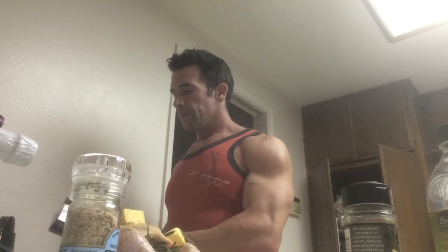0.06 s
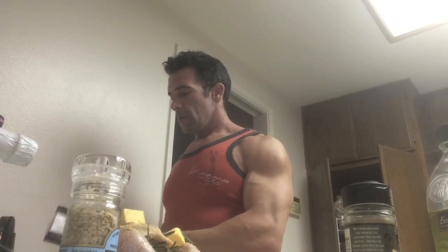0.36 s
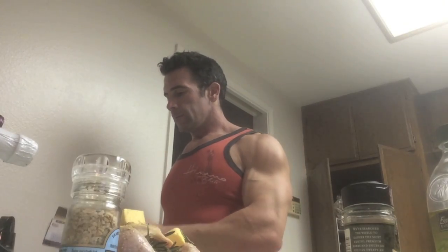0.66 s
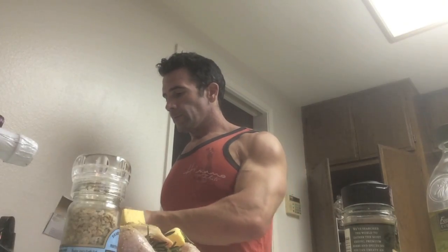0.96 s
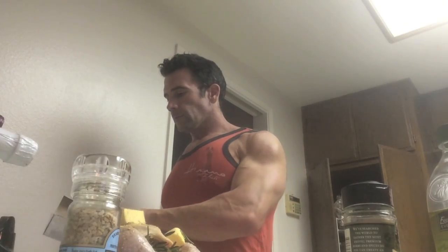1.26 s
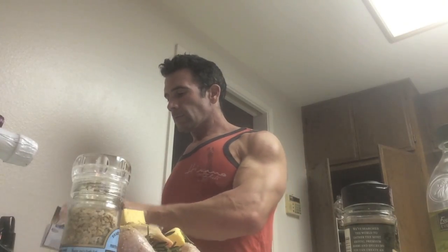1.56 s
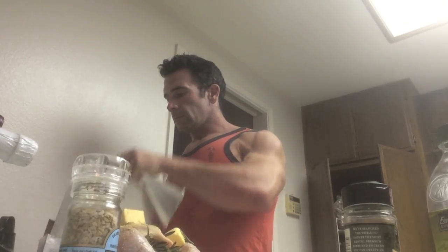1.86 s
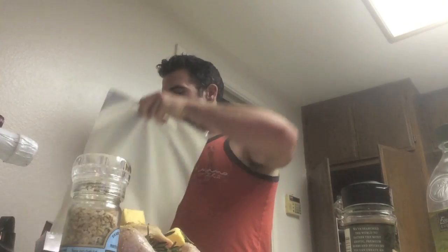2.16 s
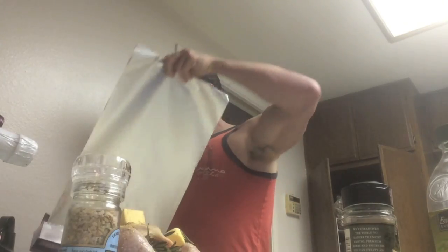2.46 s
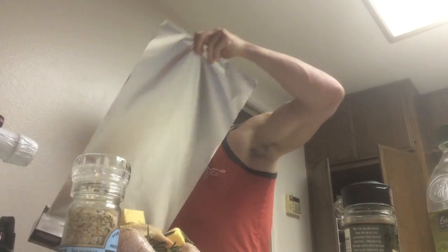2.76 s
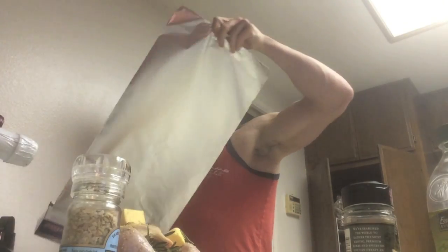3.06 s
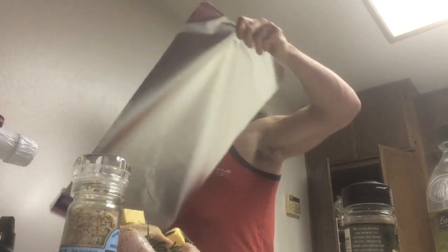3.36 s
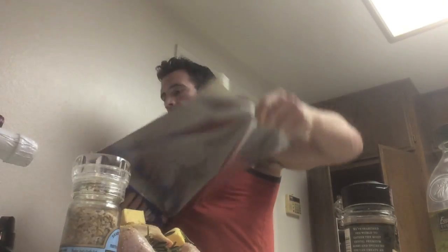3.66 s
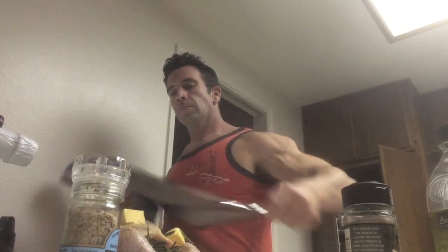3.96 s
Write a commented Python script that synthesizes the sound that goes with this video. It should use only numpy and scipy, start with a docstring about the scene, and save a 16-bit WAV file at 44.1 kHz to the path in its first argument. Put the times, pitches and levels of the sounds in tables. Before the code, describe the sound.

Metal foil is handled in a small kitchen with a faint appliance hum. For the first 1.5 seconds, fingers knock a cardboard box and pick at the foil with small crinkles. Then the sheet is pulled out in bright crackling surges while the roll bumps and slips. After a brief dip near 3.2 seconds, it is torn off and swung down, crackling until a knock at about 4 seconds.

```python
"""Over a faint appliance hum and a brief whine, fingers knock a cardboard box and pick at a roll of foil.
Then the sheet is drawn out in surges, torn off and swung down: a dense crackle of tiny buckles,
with a rattle and rustle from the wide ones. The roll bumps and slips in the box and the sheet flaps.
The close walls of a small kitchen answer; one microphone."""
import sys
import numpy as np
from scipy import signal
from scipy.fft import rfft, irfft, next_fast_len
from scipy.io import wavfile
from scipy.ndimage import map_coordinates

SR = 44100
rng = np.random.default_rng(int(sys.argv[2]) if len(sys.argv) > 2 else 0)


def bounce(signal):
    """Save signal as a 16-bit WAV file at the path given by the first command-line argument."""
    frames = np.transpose(np.atleast_2d(signal))
    limited = np.clip(frames, -1, 1)
    pcm = np.round(limited * 32767).astype(np.int16)
    wavfile.write(sys.argv[1], SR, pcm)


N = 176400
TIME_S = np.arange(N) / SR
TOP_HZ = 15600


def amp(db):
    return 10 ** (np.asarray(db) / 20)


def unit_rms(x):
    return x / np.sqrt(np.mean(x ** 2) + 1e-20)


def curve(points):
    """Function of frequency through (f/Hz, value) points, on a log axis."""
    f, value = np.transpose(points)
    return lambda hz: np.interp(np.log(hz + 1), np.log(f + 1), value)


def resonance(centre_hz, octaves):
    """Gain in dB of one resonance, as a function of frequency."""
    return lambda hz: -20 * np.log10(1 + (np.log2((hz + 1) / centre_hz) / octaves) ** 2)


def wobble(knots_per_s):
    """Smooth random curve."""
    return map_coordinates(rng.standard_normal(N // 20), [TIME_S * knots_per_s], mode="wrap")


def colour(x, gain_db):
    """Minimum-phase filter with response gain_db(hz)."""
    m = 2 * next_fast_len(len(x))
    cepstrum = irfft(np.log(amp(gain_db(np.fft.rfftfreq(m, 1 / SR))) + 1e-6), m)
    cepstrum[1:m // 2] *= 2
    cepstrum[m // 2 + 1:] = 0
    return irfft(rfft(x, m) * np.exp(rfft(cepstrum)), m)[:len(x)]


def shaped(x, spectrum):
    return unit_rms(colour(x, curve(spectrum)))


def add(track, start_s, sound):
    part = track[max(round(start_s * SR), 0):][:len(sound)]
    part += sound[:len(part)]


def snaps(samples, per_s, spread_db):
    """Random impulses with capped log-normal sizes."""
    strength = amp(spread_db * np.minimum(rng.standard_normal(samples), 2.5))
    return (rng.random(samples) < per_s / SR) * strength * rng.choice([-1, 1], samples)


def flurry(length_s, gain_db, per_s, spread_db, rise_share=0.18):
    """A run of snaps that builds and dies away; energy of unit power over length_s."""
    t = np.arange(SR // 4) / SR
    swell = (1 - np.exp(-t / (rise_share * length_s))) * np.exp(-(t / length_s) ** 2 / 2)
    burst = colour(snaps(len(t), per_s, spread_db) * swell, gain_db)
    return unit_rms(burst) * np.sqrt(length_s / t[-1])


# f/Hz, level/dB
AIR_SPECTRUM = [(20, -29), (50, -3.5), (110, -5), (200, 0.5), (400, -5.5), (1300, -12.5), (2500, -26),
                (4500, -24), (15000, -39)]
HUM_LINES = [(119, -67.5), (168, -69.5), (409, -70)]

def room_tone(air_db=-58, waver_rad=0.68):
    """Soft air noise and slightly unsteady appliance lines."""
    hum = sum(amp(db) * np.sqrt(2) * np.sin(2 * np.pi * hz * TIME_S + waver_rad * wobble(10))
              for hz, db in HUM_LINES)
    return hum + amp(air_db) * shaped(rng.standard_normal(N), AIR_SPECTRUM)


def whine(hz=3490, db=-76.5, end_s=0.65):
    """A faint steady tone that stops early on."""
    gate = np.clip((end_s - TIME_S) / .01, 0, 1)
    return amp(db) * np.sin(2 * np.pi * hz * TIME_S) * gate


# f/Hz, level/dB, t60/s
BOX_MODES = [(177.7, -3, 0.15), (339, -0.5, 0.11), (394, 0, 0.045), (683, -4.5, 0.057), (1083, 1.5, 0.047),
             (1340, -5, 0.025)]
# t/s, level/dB, centre of struck range f/Hz
BOX_KNOCKS = [(0.1188, -30.5, 373), (0.328, -35.5, 1290), (1.623, -33.5, 140), (3.985, -30.5, 490)]

def knocks(attack_s=0.00056, octaves=1.2):
    """Fingers and roll knock the hollow box; each knock favours its own range of modes."""
    out, t = np.zeros(N), np.arange(SR // 2) / SR
    for s, knock_db, centre_hz in BOX_KNOCKS:
        ring = np.zeros(len(t))
        for hz, db, t60 in BOX_MODES:
            weight = np.exp(-(np.log2(hz / centre_hz) / octaves) ** 2)
            ring += weight * amp(db - 60 * t / t60) * np.sin(2 * np.pi * hz * t)
        add(out, s, amp(knock_db) * ring * (1 - np.exp(-t / attack_s)))
    return out


# t/s, f/Hz
SQUEAK_PITCH = [(.145, 9200), (.185, 11100), (.235, 12200), (0.328, 10000), (.38, 9700)]

def squeak(db=-73, roughness=.007, lower_ratio=0.91, lower_db=-3):
    """Two thin high partials arch up and down together."""
    s, hz = np.transpose(SQUEAK_PITCH)
    pitch_hz = np.interp(TIME_S, s, hz) * (1 + roughness * wobble(580))
    phase = 2 * np.pi * np.cumsum(pitch_hz) / SR
    progress = np.clip((TIME_S - s[0]) / (s[-1] - s[0]), 0, 1)
    swell = np.sqrt(np.abs(np.sin(np.pi * progress)))
    return amp(db) * swell * (np.sin(phase) + amp(lower_db) * np.sin(lower_ratio * phase))


# t/s, level/dB, length/s
FOIL_CRUMPLES = [(0.181, -63.5, 0.061), (0.32, -58.5, 0.014), (0.401, -59, 0.013), (0.596, -56.5, 0.012),
                 (0.767, -55.5, 0.016), (0.818, -53, 0.013), (0.882, -43, 0.023), (1.01, -50.5, 0.02),
                 (1.22, -62.5, 0.029), (1.358, -47.5, 0.025), (1.41, -43, 0.028), (1.448, -40, 0.024),
                 (1.496, -38.5, 0.0078), (1.555, -36.5, 0.005), (1.654, -43.5, 0.01), (3.406, -32, 0.032),
                 (3.655, -30.5, 0.024), (3.864, -34.5, 0.056)]
# f/Hz, level/dB
CRUMPLE_SPECTRUM = [(150, -21), (500, -6.5), (1300, 1.5), (2400, 3), (2900, 0.5), (4300, 2), (7500, -1.5),
                    (9000, -10.5), (15000, -12)]

def crumples():
    """The foil crumples under the fingers."""
    out = np.zeros(N)
    for s, db, length_s in FOIL_CRUMPLES:
        add(out, s, amp(db) * flurry(length_s, curve(CRUMPLE_SPECTRUM), per_s=5000, spread_db=1.5))
    return out


# t/s, level/dB, f/Hz
PATCH_POPS = [(0.304, -49.5, 1480), (1.012, -44, 520), (2.212, -32.5, 990), (2.378, -30, 930),
              (2.922, -23.5, 790), (2.952, -30.5, 1030)]

def pops(length_s=0.0073, octaves=0.43):
    """A wide patch of foil or card pops through."""
    out = np.zeros(N)
    for s, db, hz in PATCH_POPS:
        add(out, s, amp(db) * flurry(length_s, resonance(hz, octaves), per_s=3100, spread_db=3))
    return out


# t/s, level/dB, length/s
BOX_SCRAPES = [(0.67, -54.5, 0.071), (1.064, -53, 0.032)]
# f/Hz, level/dB
SCRAPE_SPECTRUM = [(100, -8), (300, -6), (520, 4), (800, -7), (1300, -3.5), (2500, -20), (3400, -13),
                   (14000, -36)]

def scrapes():
    """The box slides under the hands."""
    out = np.zeros(N)
    for s, db, length_s in BOX_SCRAPES:
        add(out, s, amp(db) * flurry(length_s, curve(SCRAPE_SPECTRUM), per_s=2900, spread_db=5))
    return out


# t/s, level/dB
CREASE_TICKS = [(0.92, -42.5), (.989, -51), (1.013, -48), (1.03, -66), (1.415, -35.5), (1.457, -35.5),
                (1.518, -36), (1.759, -38.5), (1.894, -39), (2.383, -45), (2.862, -32), (3.082, -32.5),
                (3.436, -29.5), (3.564, -40), (3.876, -36.5)]
# f/Hz, level/dB
CREASE_SPECTRUM = [(1000, -18.5), (4300, -0.5), (7500, -1), (15000, -8.5)]

def creases(length_s=0.0085):
    """A crease snaps over with a bright tick."""
    out = np.zeros(N)
    for s, db in CREASE_TICKS:
        add(out, s, amp(db) * flurry(length_s, curve(CREASE_SPECTRUM), per_s=8000, spread_db=2))
    return out


# t/s, level/dB, length/s
ROLL_BUMPS = [(1.2, -51.5, 0.026), (1.621, -40, 0.02), (2.024, -44, 0.023), (2.196, -38.5, 0.039),
              (2.345, -37.5, 0.028), (2.923, -33.5, 0.021), (3.27, -40.5, 0.011)]
# f/Hz, level/dB
BUMP_SPECTRUM = [(20, -43), (45, -17), (90, -11.5), (165, 3), (240, 0.5), (350, 1), (550, -4.5),
                 (900, -6.5), (1500, -17), (4000, -69)]

def bumps():
    """The roll bumps in the box and the sheet flaps."""
    out = np.zeros(N)
    for s, db, length_s in ROLL_BUMPS:
        add(out, s, amp(db) * flurry(length_s, curve(BUMP_SPECTRUM), per_s=1100, spread_db=3))
    return out


def tinkles(count=2000, centre_hz=6800, octaves=0.689, ring_s=0.0034, spread_db=0.2):
    """Single facets of foil snap over, each ringing briefly at its own pitch."""
    pitch, size = rng.standard_normal((count, 2)).T[:, :, None]
    start = rng.integers(0, N, (count, 1))
    k = np.arange(SR // 100)
    hz = np.clip(centre_hz * 2 ** (octaves * pitch), 1000, TOP_HZ)
    grains = amp(spread_db * size) * np.exp(-k / SR / ring_s) * np.sin(2 * np.pi * hz * k / SR)
    return unit_rms(np.bincount((start + k).ravel(), grains.ravel(), N)[:N])


def surges(s, db, start_s=1.36, rise_db_per_s=43):
    """Envelope of the sheet: it gathers speed, then follows the given levels."""
    run_up_db = rise_db_per_s * np.maximum(s[0] - TIME_S, 0)
    return amp(np.interp(TIME_S, s, db) - run_up_db) * (TIME_S > start_s)


# Drawn out, then torn off and swung down: t/s, crackle level/dB, fizz level/dB
PULL_LEVELS = [(1.58, -49.5, -52.5), (1.69, -43, -48), (1.755, -37.5, -43.5), (1.796, -44, -53),
               (1.896, -37, -42.5), (1.96, -44, -63), (2.06, -36, -44), (2.394, -31, -36),
               (2.416, -35.5, -41), (2.69, -39.5, -48.5), (2.716, -35, -41.5), (2.814, -35, -42),
               (2.9, -30.5, -33), (3.094, -34.5, -39.5), (3.13, -45, -54), (3.18, -42, -50)]
SWING_LEVELS = [(3.2, -38.5, -41), (3.27, -35, -36.5), (3.39, -35.5, -43.5), (3.53, -29.5, -35),
                (3.63, -37.5, -50.5), (3.762, -33, -41), (3.845, -41.5, -63), (3.88, -28, -34.5),
                (3.97, -36, -41), (4.0, -25, -36)]
# Rattle and rustle: t/s, level/dB
WIDE_LEVELS = [(1.44, -62), (1.6, -48.5), (2.17, -43.5), (2.2, -36), (2.4, -42.5), (2.66, -46), (2.92, -41),
               (3.06, -44.5), (3.19, -53.5), (3.25, -40), (3.37, -47.5), (3.5, -41), (3.96, -45)]
# f/Hz, level/dB
CRACKLE_SPECTRUM = [(1200, -42.5), (1800, -8.5), (2500, -2), (2900, -5.5), (3400, -1.5), (4100, -0.5),
                    (5500, -1.5), (7500, -5), (8500, -14), (11000, -20), (16000, -60)]
FIZZ_SPECTRUM = [(4000, -48), (7500, -7), (9000, -2), (11000, 0), (13500, -2), (15500, -7.5)]
RATTLE_SPECTRUM = [(300, -37), (620, -11), (850, -0.5), (1000, -4), (1250, 2), (1600, -2.5), (2100, -7.5),
                   (3500, -32.5)]
RUSTLE_SPECTRUM = [(20, -41), (45, -13), (90, -5.5), (170, -3.5), (340, 3.5), (550, 4), (900, -21.5),
                   (2000, -27)]

def sheet(chatter_db=3, tinkle_db=-5, sparkle_db=1):
    """The moving sheet buckles: small buckles crackle, tinkle and fizz, wide ones rattle and rustle."""
    s, crackle_db, fizz_db = np.vstack([PULL_LEVELS, SWING_LEVELS]).T
    wide_envelope = surges(*np.transpose(WIDE_LEVELS))
    small = unit_rms(snaps(N, per_s=6000, spread_db=-1)) + amp(tinkle_db) * tinkles()
    wide = amp(chatter_db * wobble(35)) * snaps(N, per_s=1300, spread_db=0)
    slack = snaps(N, per_s=700, spread_db=5.5)
    crackle = surges(s, crackle_db) * shaped(small, CRACKLE_SPECTRUM)
    fizz = surges(s, fizz_db) * amp(sparkle_db * wobble(45)) * shaped(small, FIZZ_SPECTRUM)
    rattle = wide_envelope * shaped(wide, RATTLE_SPECTRUM)
    rustle = wide_envelope * shaped(slack, RUSTLE_SPECTRUM)
    return amp(-0.5) * (crackle + fizz) + amp(1) * rattle + amp(-9) * rustle


# t/s, level/dB
ROLL_SLIPS = [(1.503, -41), (1.557, -43.5), (1.641, -42), (1.716, -42.5), (1.752, -45), (1.826, -41),
              (1.877, -41), (2.061, -34.5), (2.33, -33), (2.839, -41), (3.087, -41.5)]

def slips(hz=1190, octaves=0.18, length_s=0.013):
    """The roll catches and slips against the box."""
    out = np.zeros(N)
    for s, db in ROLL_SLIPS:
        add(out, s, amp(db) * flurry(length_s, resonance(hz, octaves), per_s=980, spread_db=3))
    return out


# f/Hz, t60/s
WALL_DECAY = [(100, 0.59), (500, 0.28), (2000, 0.58), (15000, 0.35)]

def kitchen(x, wet_db, hop_s=.06, delay_s=.002):
    """Direct sound plus the walls' diffuse tail, redrawn each hop so no pitch rings on."""
    wet, hop = np.zeros(N), round(hop_s * SR)
    for start in range(0, N, hop):
        hz, t, noise = signal.stft(rng.standard_normal(SR // 3), SR, nperseg=256)
        decay = amp(-60 * t / curve(WALL_DECAY)(hz)[:, None])
        tail = signal.istft(noise * decay, SR, nperseg=256)[1]
        tail /= np.linalg.norm(tail)
        add(wet, start / SR + delay_s, signal.fftconvolve(x[start:start + hop], tail))
    return (x + amp(wet_db) * wet) / np.hypot(1, amp(wet_db))  # constant power


def scene():
    """Foil and box in the kitchen, alike in both channels."""
    handling = squeak() + crumples() + pops() + scrapes() + creases() + bumps() + sheet() + slips()
    mono = room_tone() + whine() + kitchen(knocks(), wet_db=-5) + kitchen(handling, wet_db=-2)
    return np.array([mono, mono])


def record(dry):
    """Brick-wall low-pass at TOP_HZ."""
    m = next_fast_len(N + SR // 2)
    passband = np.fft.rfftfreq(m, 1 / SR) < TOP_HZ
    return irfft(rfft(dry, m) * passband, m)[:, :N]


dry = scene()
out = record(dry)
bounce(out)
```